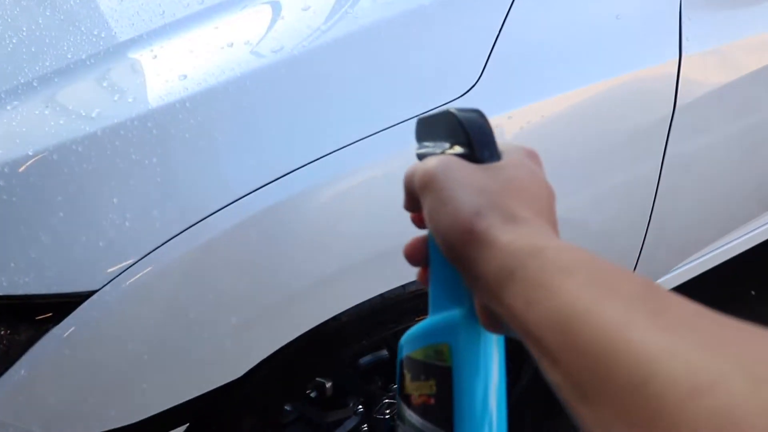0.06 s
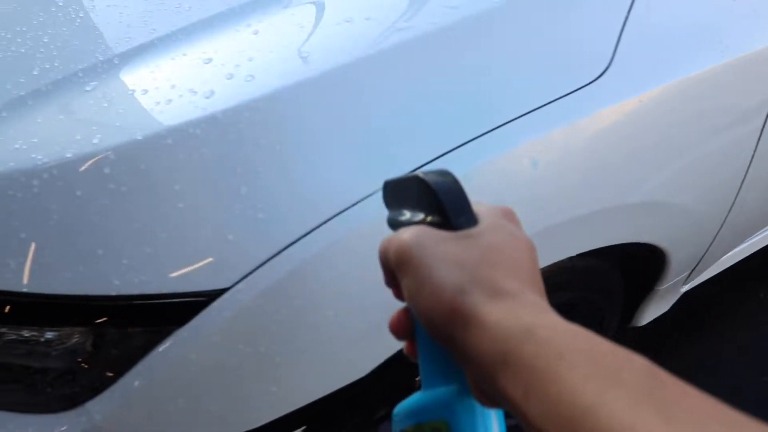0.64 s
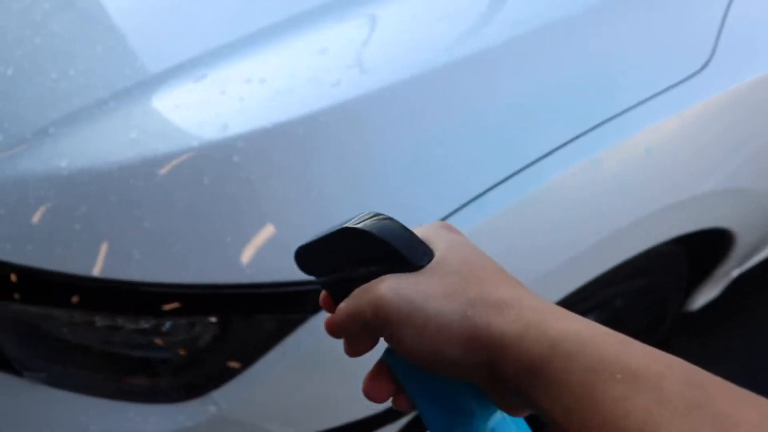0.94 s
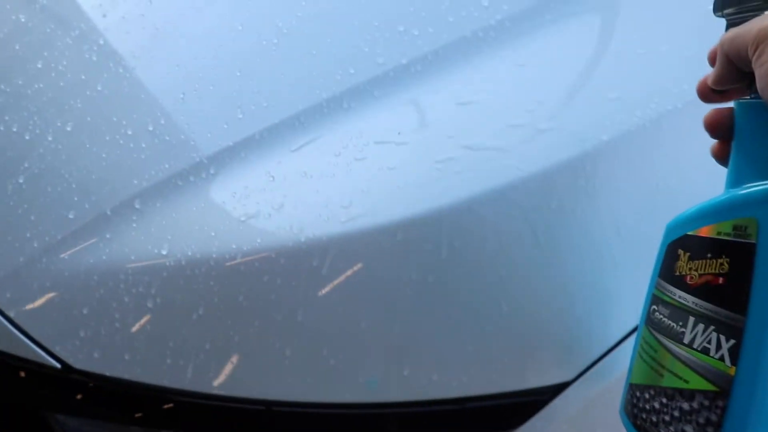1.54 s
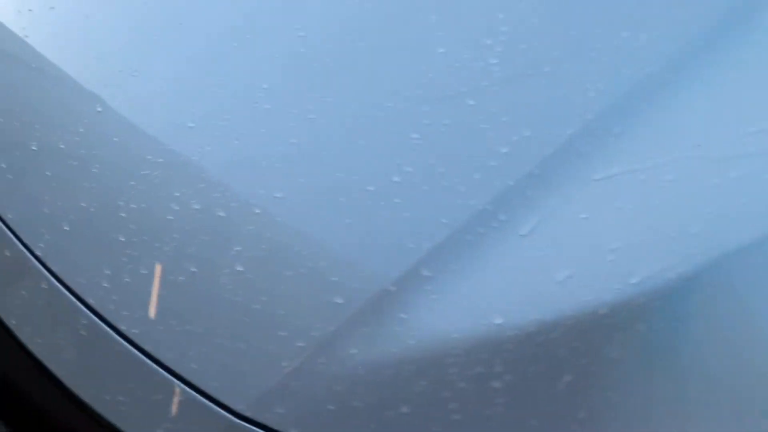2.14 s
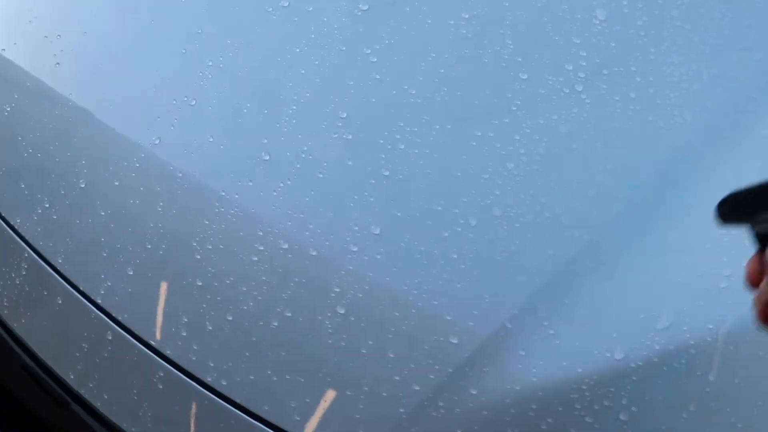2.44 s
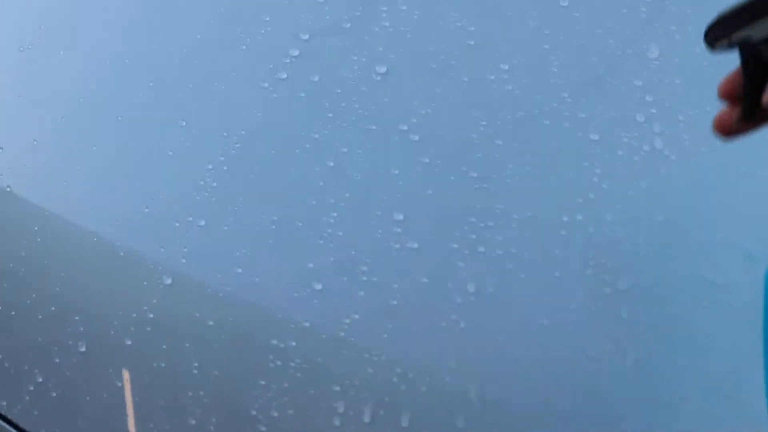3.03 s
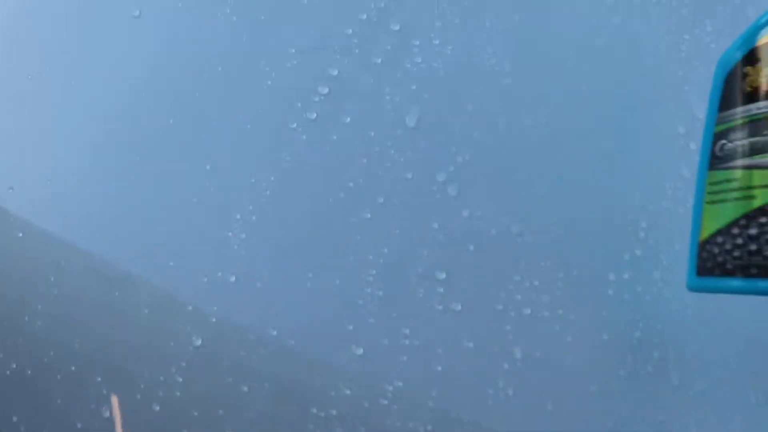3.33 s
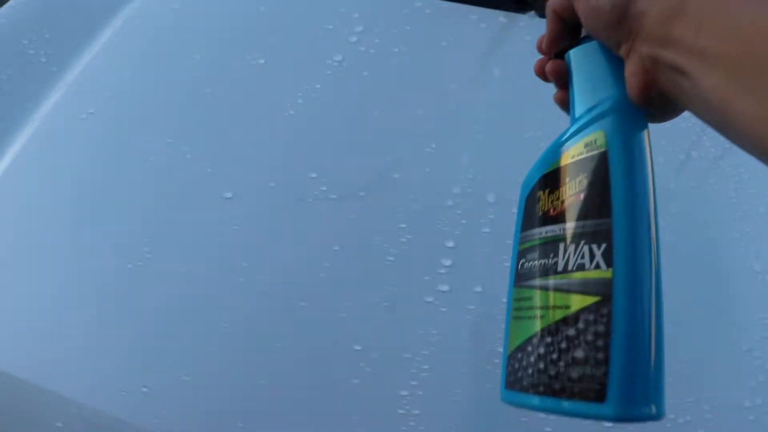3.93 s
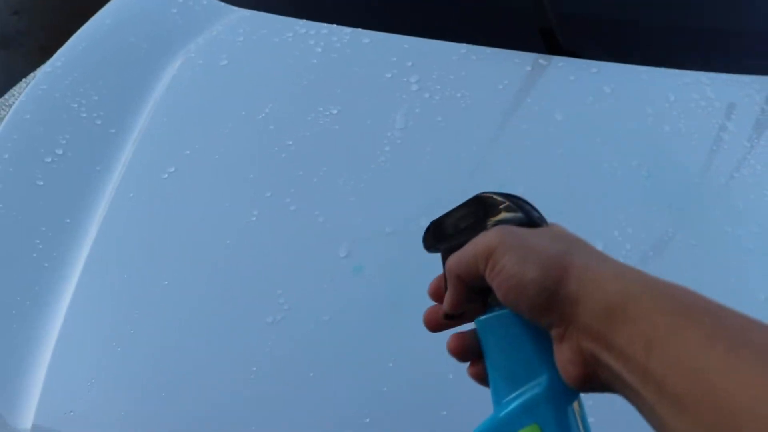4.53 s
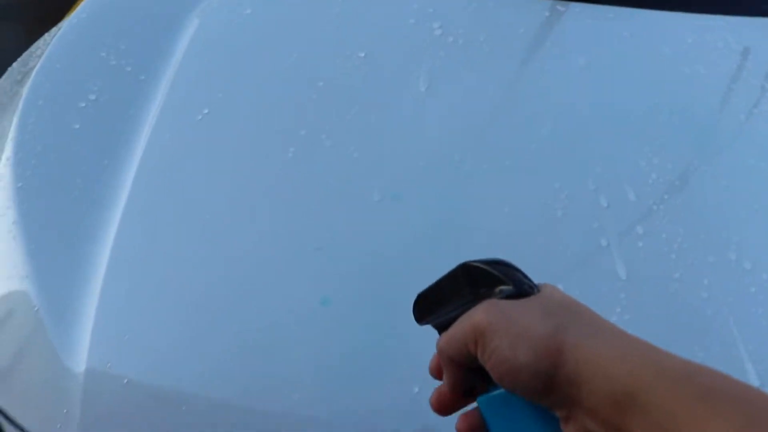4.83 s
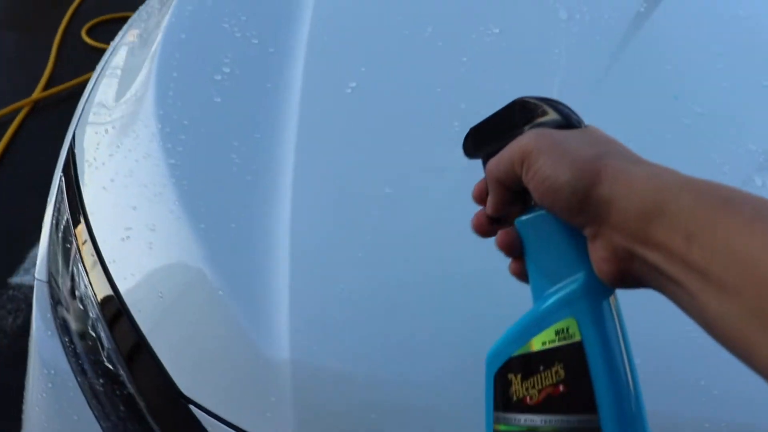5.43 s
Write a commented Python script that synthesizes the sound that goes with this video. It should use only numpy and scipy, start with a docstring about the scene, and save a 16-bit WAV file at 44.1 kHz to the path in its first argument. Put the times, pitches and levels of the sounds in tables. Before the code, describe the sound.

Repeated short hissing squirts and plastic trigger clicks from a hand spray bottle outdoors, over wind rumbling on the microphone.

```python
"""Spraying wax on a car bonnet

A trigger bottle works outdoors, an arm's length from a hand-held camera. Each stroke is a stick-slip
creak and snap of plastic, the broadband hiss of an atomised jet, then a click as the trigger springs
back. One sharp trigger click marks the first squirt; later come two bouts of knocks by the microphone.
Under everything lie the rumble of turbulent wind on the microphone and a distant murmur."""
import sys
import numpy as np
from scipy import signal
from scipy.fft import rfft, irfft, next_fast_len
from scipy.io import wavfile
from scipy.ndimage import uniform_filter1d, map_coordinates

SR = 44100
rng = np.random.default_rng(int(sys.argv[2]) if len(sys.argv) > 2 else 0)


def pcm_store(signal):
    """Save signal as 16-bit PCM."""
    levels = np.round(np.clip(np.atleast_2d(signal), -1, 1) * 32767)
    wavfile.write(sys.argv[1], SR, levels.astype(np.int16).T)


N = 245718

# Trigger strokes: (time [s], creak level [dB], creak treble gain [dB], valve tick lag [s],
# tick level [dB], pressure rise [s], full flow [s], decay constant [s], mist level [dB],
# swell over the full flow [dB], patter offset from the mist [dB])
STROKES = [(-0.07, -28, 0, 0.018, -31, 0.039, 0.064, 0.025, -30, -11, -5.5),
           (0.2724, -29.5, 0, 0.0088, -41, 0.031, 0.083, .016, -36, -2.5, -5.5),
           (0.624, -31.5, -3, 0.0073, -30, 0.049, .055, 0.028, -38.5, -7.5, -7),
           (1.1213, -33.5, -8, 0.0093, -28.5, 0.086, 0.03, 0.027, -26, 4, -6.5),
           (1.594, -22.5, 0, 0.013, -46, 0.037, 0.051, .028, -29.5, -1.5, -6),
           (1.9911, -31.5, 1, .015, -34, 0.048, 0.082, 0.023, -31.5, 0, -8.5),
           (2.3481, -24.5, 9, 0.0098, -24, 0.039, 0.086, 0.011, -27.5, -4.5, -7),
           (2.736, -38, 0.5, 0.0092, -29.5, 0.068, 0.058, 0.016, -26.5, -2, -10.5),
           (3.105, -31.5, -4, 0.0045, -41, 0.033, 0.079, 0.0069, -36, -6.5, -8.5),
           (3.555, -34.5, 2, 0.012, -37, 0.063, 0.03, 0.027, -38.5, -4, -3),
           (3.9149, -34.5, 6, 0.01, -36.5, 0.08, 0.024, 0.015, -39.5, -1, -4),
           (4.2889, -29.5, 6, .007, -41, 0.075, 0.051, 0.012, -42.5, -2, -5),
           (4.654, -37.5, 8, .009, -40, 0.056, 0.059, .012, -38.5, -4, -5.5),
           (5.127, -37, -3, .01, -34.5, 0.042, 0.069, 0.011, -30.5, -0.5, -9),
           (5.477, -38.5, 8, 0.008, -41, 0.025, .11, 0.018, -41, -1, -9)]
# Returns of the trigger: (time [s], level [dB])
RELEASES = [(0.1465, -30), (0.4866, -42.5), (0.826, -48), (1.3915, -27.5), (1.807, -29.5), (2.227, -29.5),
            (2.966, -29.5), (3.314, -38), (3.7717, -38), (4.142, -48), (4.518, -50), (4.882, -45),
            (5.358, -39.5)]
# A click of the trigger bottoming out, then handling knocks: (time [s], peak level [dB], resonance [Hz])
IMPACTS = [(0.0405, -10, 8900), (1.261, -7, 2410), (1.2644, -11, 1080), (1.2806, -4.5, 2880),
           (1.286, -14, 2550), (1.2907, -10, 3900), (1.2897, -1.5, 1450), (2.5018, -17.5, 546),
           (2.5496, -15, 1700), (2.557, -12.5, 2960), (2.5563, -17, 800), (2.5618, -15.5, 865)]
# Mode clusters woken by impacts: (centre [Hz], nominal width [Hz], relative level [dB], t60 [s])
RING_MODES = [(1360, 190, 2, 0.72), (1600, 170, 1, 1.0), (1684, 110, 3, 1), (2360, 300, -9, .7)]
# Finger friction, one contour per rub: (time [s], relative level [dB])
RUBS = [
    [(1.2, -37.5), (1.29, -19.5), (1.31, -64)],
    [(2.47, -45), (2.566, -26), (2.69, -57)],
]
# Wind strength: (time [s], relative level [dB])
GUSTS = [(0.0, -47), (0.73, -28.5), (0.81, -46), (0.89, -30), (0.99, -37.5), (1.05, -34), (1.57, -40),
         (2.0, -24.5), (2.06, -30.5), (2.46, -43.5), (2.58, -31), (2.99, -34.5), (3.17, -26), (4.16, -31.5),
         (4.34, -20.5), (4.42, -34), (4.56, -23.5), (4.68, -32.5), (4.78, -19), (4.86, -35), (5.07, -23),
         (5.19, -42), (5.25, -27), (5.37, -36), (5.41, -24), (5.57, -34.5)]
# Single buffets of wind: (time [s], rise in wind strength [dB])
BUFFETS = [(0.49, 8), (0.59, 7.5), (1.83, 4.5), (2.65, 8), (3.24, 4), (3.44, 6), (4.36, 3.5), (4.58, 3.5)]
# Lulls in the wind's deep roll: (time [s], depth [dB])
ROLL_LULLS = [(1.22, 6.5), (1.54, 25), (3.13, 9.5), (4.88, 5.5)]
# Distant murmur: (time [s], level [dB])
MURMUR_LEVELS = [(0.0, -41.5), (0.7, -52), (1.15, -44.5), (1.5, -44), (1.9, -47.5), (2.35, -45),
                 (3.4, -52.5), (4.6, -56.5), (5.05, -51.5), (5.5, -50.5)]
# Brief dips in the murmur: (time [s], depth [dB])
MURMUR_DIPS = [(0.245, 11), (0.54, 12), (1.87, 10), (2.71, 7.5), (3.08, 9), (3.89, 5), (4.59, 2),
               (5.445, 16)]
# Spectral envelopes of the sources: (frequency [Hz], relative level [dB])
MIST_SPECTRUM = [(290, -39.5), (500, -10.5), (708, -11), (807, -8.5), (960, -7.5), (1260, -5.5), (2010, -2),
                 (2390, -5.5), (2810, -4.5), (5550, -2.5), (7420, -6), (8700, -1), (10700, -18),
                 (13600, -8), (16000, -20)]
PRESS_SPECTRUM = [(590, -49), (1000, -5.5), (1710, -10), (2100, -10.5), (3750, -8), (4170, -6.5),
                  (6860, -4.5), (8550, -2), (10700, -13), (13400, -4), (16000, -17)]
RELEASE_SPECTRUM = [(590, -33), (1000, -8.5), (2410, -10), (4470, -11.5), (5250, -9), (7440, -10),
                    (8650, -7), (9490, -11.5), (10700, -18), (12700, -6), (16000, -23)]
RUB_SPECTRUM = [(210, -38.5), (350, -1.5), (642, -3.5), (1430, -16), (1630, -16), (5480, -19), (12000, -37),
                (15600, -86), (22000, -120)]
WIND_SPECTRUM = [(12, -28), (20, -3), (40, 1.5), (68, -3.5), (130, -13.5), (200, -23.5), (300, -31),
                 (450, -45), (700, -61.5), (1400, -102)]
AIR_SPECTRUM = [(240, -20), (400, -6.5), (655, -7.5), (719, -4.5), (777, -7), (1010, -6.5), (1110, -8.5),
                (1200, -10), (2630, -21), (8500, -29.5), (9180, -31), (13900, -33), (16000, -40.5)]

NOZZLE_LAG_S = 0.023  # from squeeze to first mist
AFTER_HISS_DB, AFTER_HISS_S = -28, 0.13  # faint hiss after a squirt; level relative to its mist
PRESS_RING_HZ, RELEASE_RING_HZ = 8450, 8840
IMPACT_DAMPING = 0.62  # bandwidth over centre frequency


def spray():
    """Atomisation: the jet hisses with the pump pressure, and drop impacts patter lower on the paint."""
    jet = unit(rng.standard_normal(N) + 0.6 * droplets(per_s=3300, spread_db=5))
    mist = split(colour(jet, MIST_SPECTRUM), 2060)[1] * amp(0.34 * wander(280))
    drops = colour(droplets(per_s=7000, spread_db=3.5), MIST_SPECTRUM)
    patter = split(drops, 2680)[0] * amp(2 * wander(120))
    mist, patter = panel_reflection(mist), panel_reflection(patter)
    spit = unit(resonate(droplets(per_s=120, spread_db=0), 13000, 3000))
    fine_drops = colour(droplets(per_s=3600, spread_db=2), MIST_SPECTRUM)
    after_hiss = unit(split(fine_drops, 5000, order=1)[0])
    out = np.zeros(N)
    for time, *_, rise, hold, fall, db, swell_db, patter_db in STROKES:
        start = time + NOZZLE_LAG_S
        flow = nozzle_flow(start, rise, hold, fall, db, swell_db)
        # the first liquid leaves as coarse drops, so the patter is up sooner than the mist
        lead = 0.29 * rise
        wetting = nozzle_flow(start, rise - lead, hold + lead, fall, db, swell_db)
        out += amp(0.92) * flow * mist + amp(patter_db + 1.7) * wetting * patter
        # weak pressure breaks the jet up badly, so the spitting outlasts the mist
        out += amp(-30.5) * flow ** 0.62 * spit
        end = start + rise + hold
        out += amp(db + AFTER_HISS_DB) * gate(end, end + AFTER_HISS_S, fade_s=0.018) * after_hiss
    return out


def nozzle_flow(start, rise, hold, fall, db, swell_db):
    """Pressure-driven flow: it builds, follows the fingers, then drains exponentially."""
    t = np.arange(N) / SR - start
    travel = np.clip((t - rise) / hold, 0, 1)
    opening = np.sin(np.pi / 2 * np.clip(t / rise, 0, 1)) ** 2
    draining = np.exp(-np.clip((t - rise - hold) / fall, 0, 20))
    return opening * draining * amp(db + swell_db * (travel - 0.5))


def panel_reflection(x, lag_s=0.001, gain=0.3):
    """Comb filtering: the panel's reflection interferes with the hiss; its lag moves with the bottle."""
    delayed_index = np.arange(N) - SR * lag_s * amp(2 * wander(2.5))
    return unit(x + gain * map_coordinates(x, [delayed_index], order=3))


def trigger():
    """Transient excitation of plastic: a creak, snap and valve tick on squeezing, a clack on release."""
    out = np.zeros(N)
    for time, db, treble_db, tick_lag, tick_db, *_ in STROKES:
        squeeze = stick_slip(slide_s=0.0052, friction=0.43, decay_s=0.00087, tail=0.13)
        creak = spray_head(squeeze, PRESS_SPECTRUM, PRESS_RING_HZ, ring_db=-3)
        creak += (amp(treble_db) - 1) * resonate(creak, 13400, 3000)
        add(out, time, at_level(creak, db, span_s=0.00613))
        valve = stick_slip(slide_s=0, friction=0, decay_s=0.0027, tail=0.16)
        tick = spray_head(valve, PRESS_SPECTRUM, PRESS_RING_HZ, ring_db=-16)
        add(out, time + tick_lag, at_level(tick, tick_db, span_s=0.0026))
    for time, db in RELEASES:
        spring = stick_slip(slide_s=0.0048, friction=0.27, decay_s=0.0013, tail=0.05)
        clack = spray_head(spring, RELEASE_SPECTRUM, RELEASE_RING_HZ, ring_db=0.5)
        add(out, time, at_level(clack, db, span_s=0.0064))
    return out


def stick_slip(slide_s, friction, decay_s, tail):
    """Stick-slip friction: the piston breaks loose, judders along, then snaps home."""
    t = np.arange(SR // 20) / SR
    slips = rng.standard_normal(len(t))
    slips *= amp(0.74 * np.repeat(rng.standard_normal(len(t)), 20)[:len(t)])
    breakaway = 1 + 0.48 * np.exp(-t / 0.0011)
    sliding = friction * breakaway * (t < slide_s)
    since_snap = np.maximum(t - slide_s, 0)
    snap = (t >= slide_s) * (np.exp(-since_snap / decay_s) + tail * np.exp(-since_snap / 0.007))
    return slips * (sliding + snap)


def spray_head(force, spectrum, ring_hz, ring_db):
    """Forced vibration: the plastic shell filters a force and adds one sharper resonance."""
    shell = colour(force, spectrum)
    return shell + amp(ring_db) * resonate(shell, ring_hz, 750)


def impacts():
    """Impulse response: a sharp trigger click and the later knocks each excite a damped resonance."""
    out, blow = np.zeros(N), signal.unit_impulse(SR // 20)
    for time, db, hz in IMPACTS:
        width = IMPACT_DAMPING * hz
        impact = resonate(resonate(blow, hz, width), hz, width)
        add(out, time, amp(db) * impact / np.abs(impact).max())
    return out


def modal_ring(blows):
    """Free decay of crowded weak modes; the drive is square-law, so only hard blows wake them."""
    t = np.arange(SR) / SR
    modes = 0
    for hz, width, db, t60 in RING_MODES:
        band = resonate(rng.standard_normal(SR), hz, 1.5 * width)
        cluster = unit(resonate(band, hz, 1.5 * width))
        modes += amp(db) * cluster * np.exp(-np.log(1000) * t / t60)
    return signal.fftconvolve(blows * np.abs(blows), modes)[:N]


def rubbing():
    """Sliding friction: skin on the camera body makes a fine grain of tiny impulses."""
    grain = unit(colour(droplets(per_s=9000, spread_db=2), RUB_SPECTRUM))
    contact = sum(gate(rub[0][0], rub[-1][0], fade_s=0.0036) * amp(contour(rub) - 4) for rub in RUBS)
    return grain * amp(2 * wander(90)) * contact


def reflections(x, t60, damp_hz):
    """Reverberation: dull reflections from the car and nearby walls decay exponentially."""
    t = np.arange(SR) / SR
    tail = rng.standard_normal(SR) * np.exp(-np.log(1000) * t / t60) * (t > 0.004)
    tail = split(tail, damp_hz, order=1)[0]
    return signal.fftconvolve(x, tail / np.sqrt(np.sum(tail ** 2)))[:N]


def wind():
    """Turbulent pressure on the microphone: the smaller the eddies, the more they follow the gusts."""
    deep, rest = split(colour(rng.standard_normal(N), WIND_SPECTRUM), 93.3)
    middle, high = split(rest, 165.5)
    flutter = split(high, 302)[1]
    for band in (deep, middle, high, flutter):  # even strength before the gusts act
        band /= np.sqrt(uniform_filter1d(band ** 2, size=3000))
    turbulence = wander(32)  # shared by all sizes of eddy
    gust_db = contour(GUSTS) + bells(BUFFETS, width_s=0.014) + 3.15 * turbulence
    roll_db = -14.5 - bells(ROLL_LULLS, width_s=0.029) + 1.6 * wander(12) + 1.4 * turbulence
    return (deep * amp(roll_db) + middle * amp(0.7 * gust_db - 2.5)
            + high * amp(gust_db - 3.5) + flutter * amp(1.59 * gust_db - 11.5))


def open_air():
    """Ambient noise: a distant murmur, a thin hiss and a faint hum that shows when they are loudest."""
    murmur = unit(split(colour(rng.standard_normal(N), AIR_SPECTRUM), 2000, order=2)[0])
    murmur *= amp(1.65 * wander(12))
    hiss = unit(split(colour(rng.standard_normal(N), AIR_SPECTRUM), 2400, order=2)[1])
    hiss *= amp(0.94 * wander(45))
    hum_hz = 720 + 3 * wander(12)
    hum = np.sin(2 * np.pi * np.cumsum(hum_hz) / SR) * amp(2 * wander(9))
    envelope = amp(contour(MURMUR_LEVELS) - bells(MURMUR_DIPS, width_s=0.024))
    return (murmur + amp(-4.5) * hum * envelope / envelope.max() + amp(-9) * hiss) * envelope


def droplets(per_s, spread_db):
    """Poisson process: tiny impacts at random moments, their sizes scattered by spread_db."""
    sizes = amp(spread_db * np.minimum(rng.exponential(size=N), 4)) * rng.choice([-1, 1], N)
    return unit(sizes * (rng.random(N) < per_s / SR))


def wander(rate_hz):
    """Random modulation: smoothed noise of rms 1."""
    step = int(SR / rate_hz)
    held = np.repeat(rng.standard_normal(N // step + 1), step)
    return unit(uniform_filter1d(held, step)[:N])


def colour(x, spectrum):
    """Minimum-phase filtering: folding the cepstrum gives a causal filter with this spectrum."""
    size = next_fast_len(len(x) + 2048, True)
    hz, db = np.transpose(spectrum)
    bin_hz = np.fft.rfftfreq(size, 1 / SR)
    gain = amp(np.interp(np.log(bin_hz + 1), np.log(hz), db))
    cepstrum = irfft(np.log(gain), size)
    cepstrum[1:size // 2] *= 2
    cepstrum[size // 2 + 1:] = 0
    return irfft(rfft(x, size) * np.exp(rfft(cepstrum)), size)[:len(x)]


def split(x, hz, order=4):
    """Crossover: the parts below and above a frequency."""
    return [signal.sosfilt(signal.butter(order, hz, kind, fs=SR, output="sos"), x)
            for kind in ("low", "high")]


def resonate(x, hz, width_hz):
    """Second-order resonance with gain 1 at its centre."""
    return signal.lfilter(*signal.iirpeak(hz, hz / width_hz, fs=SR), x)


def contour(rows):
    """Linear interpolation of levels in time."""
    return np.interp(np.arange(N) / SR, *np.transpose(rows))


def gate(start, end, fade_s):
    """Window with exponential skirts, open from start to end."""
    t = np.arange(N) / SR
    outside_s = np.maximum(start - t, t - end)
    return np.exp(-np.clip(outside_s / fade_s, 0, 20))


def bells(rows, width_s):
    """Brief bell-shaped changes of level, in decibels."""
    t = np.arange(N) / SR
    return sum(db * np.exp(-((t - time) / width_s) ** 2) for time, db in rows)


def amp(db):
    """Decibels to amplitude ratio."""
    return 10 ** (np.asarray(db) / 20)


def unit(x):
    """Normalisation to rms 1."""
    return x / np.sqrt(np.mean(x ** 2))


def at_level(x, db, span_s):
    """Equal energy: scale a transient to match span_s seconds at the given level."""
    return x * amp(db) * np.sqrt(span_s * SR / np.sum(x ** 2))


def add(out, start_s, x):
    """Superpose a sound, if it starts within the scene."""
    i = int(start_s * SR)
    if i >= 0:
        out[i:i + len(x)] += x[:N - i]


def scene():
    """Superposition of bottle, impacts, rubbing, wind and open air at one microphone."""
    bottle, blows = spray() + trigger(), impacts()
    echoes = amp(-24.5) * reflections(bottle, t60=0.14, damp_hz=5000)
    echoes += amp(-20) * reflections(blows, t60=1.0, damp_hz=4500)
    ring = amp(-62.5) * modal_ring(blows)
    return (bottle + blows + ring + echoes + rubbing() + wind() + open_air())[None]


def record(dry):
    """Soft saturation and band limiting: the camera rounds the highest peaks and cuts the top treble."""
    rounded = dry / (1 + (dry / 0.98) ** 8) ** (1 / 8)
    return signal.sosfilt(signal.ellip(10, 0.2, 80, 15950, fs=SR, output="sos"), rounded)


dry = scene()
out = record(dry)
pcm_store(out)
```